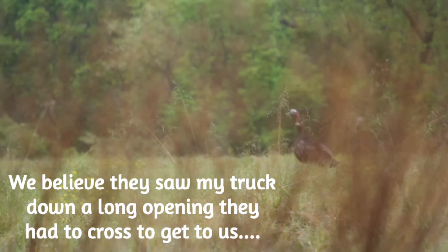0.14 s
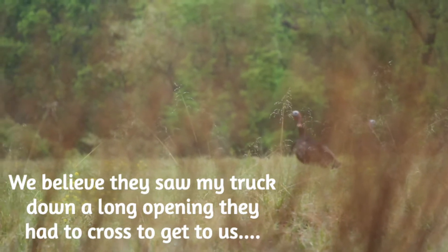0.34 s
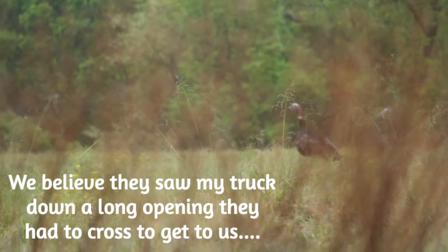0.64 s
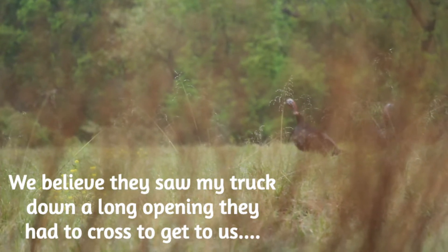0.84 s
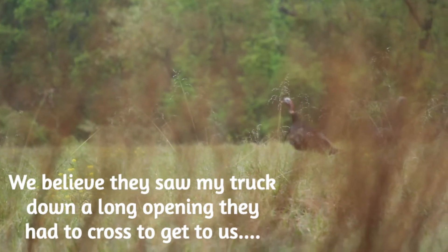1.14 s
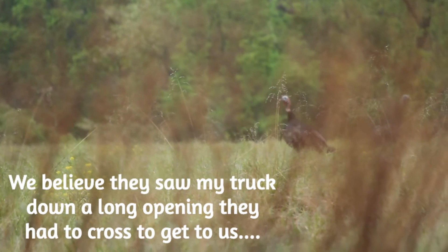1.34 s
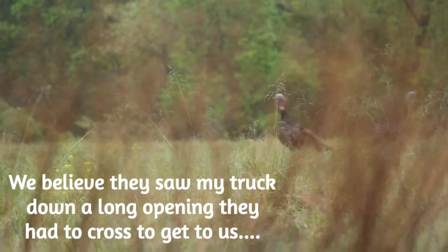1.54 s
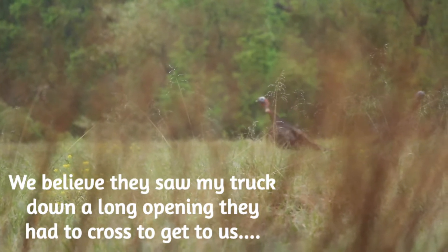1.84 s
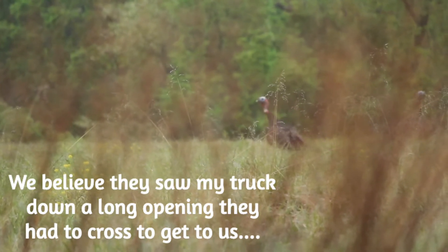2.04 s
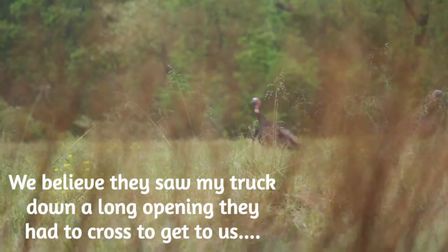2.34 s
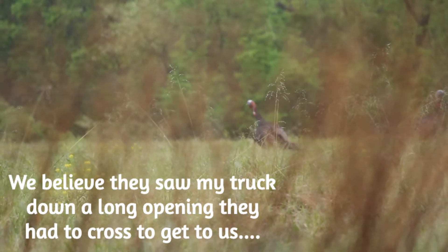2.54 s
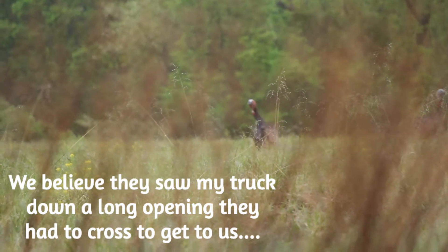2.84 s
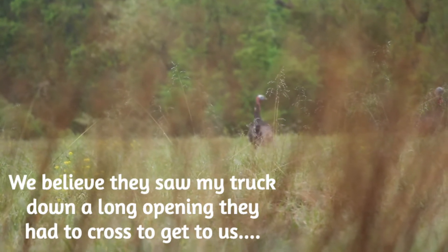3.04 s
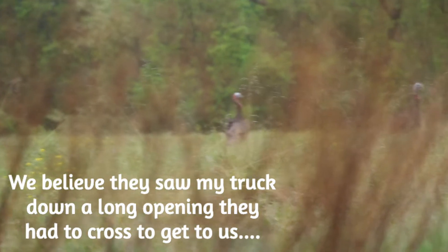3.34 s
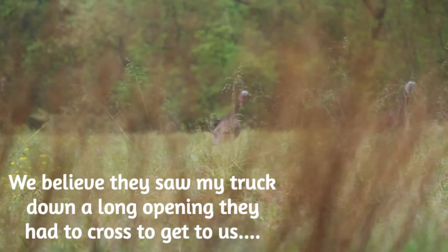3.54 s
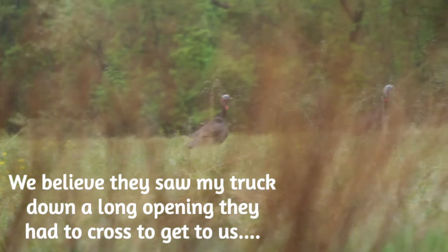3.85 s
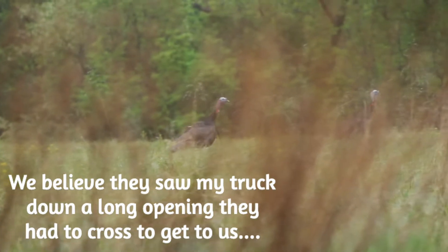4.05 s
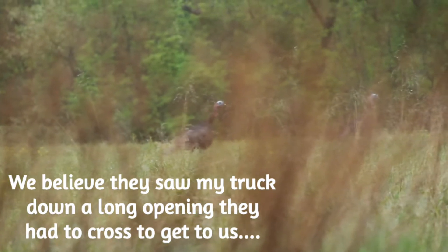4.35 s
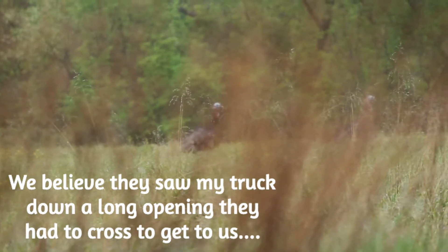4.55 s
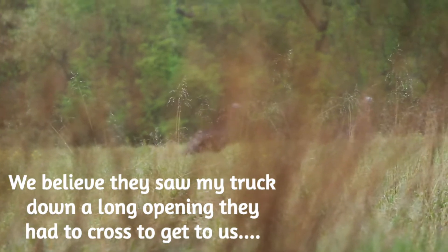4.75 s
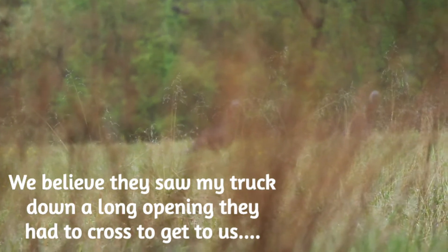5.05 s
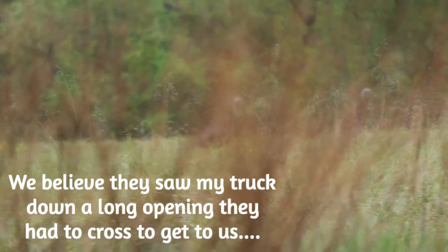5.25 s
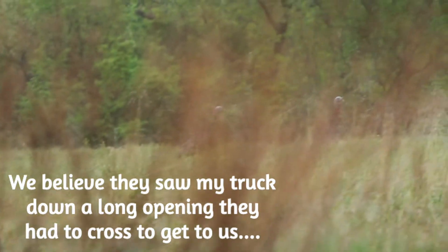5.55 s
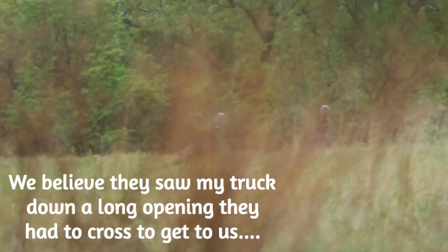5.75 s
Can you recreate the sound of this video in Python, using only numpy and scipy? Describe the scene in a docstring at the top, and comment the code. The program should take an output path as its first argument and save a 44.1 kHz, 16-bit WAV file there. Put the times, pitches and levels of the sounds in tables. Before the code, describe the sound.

Quiet outdoor hush at a wooded field edge, one channel. In the first second there are small ringing ticks and dry snaps close to the microphone, a tiny distant chip near 0.5 s and a faint, high, wavering bird wheeze at 0.75 s. At 1.0 s a turkey voice starts yelping, very loud and near: twelve short, nasal, hollow yelps about a third of a second apart, until 4.75 s. The first are clipped and plainer; later ones are longer, brighter and raspier, each flicking upward at the end, some with a popping onset and overload grit. A very short diffuse echo follows, and the hush ducks under each. Faint wheezes recur around 2.3, 3.4 and 4.3 s, with barely audible far whistles. A snap at 4.8 s, then a dull knock and scuff at 5.1 s, rustling and sharper ticks from 5.2 s, and a last wheeze at 5.5 s.

```python
"""Twelve loud turkey yelps, close by at the edge of a field: harmonic stacks shaped by an opening mouth,
with throat hiss and an opening puff; waves beyond full scale clip. A small bird wheezes in wavering lines
over breath noise, another chips and whistles far off in gliding tones. Something near ticks in ringing
modes, and knocks, snaps and rustles in tones and noise bursts over the hush of the woods, which is shaped
noise that sinks under each yelp. Decaying noise scatters the voices into a short echo."""
import sys
import numpy as np
from scipy import signal
from scipy.fft import rfft, irfft
from scipy.io import wavfile
from scipy.ndimage import uniform_filter1d

SR = 44100
rng = np.random.default_rng(int(sys.argv[2]) if len(sys.argv) > 2 else 0)


def transcribe(u):
    """Save the signal u as a 16-bit wav file named by the first command-line argument.

    u: samples, shape (n,) or (channels, n), limited to [-1, 1]; the rate is SR.
    q: integer samples, one column per channel.
    """
    v = np.clip(np.atleast_2d(u).T, -1, 1)
    q = np.round(v * 32767).astype(np.int16)
    wavfile.write(sys.argv[1], SR, q)


N = 260631
TIME = np.arange(N) / SR


def from_db(db):
    """Amplitude gain of a level in dB: a factor of ten every 20 dB."""
    return 10 ** (np.asarray(db) / 20)


def at_hz(points, hz):
    """Interpolate a spectrum in dB along a logarithmic frequency axis."""
    table_hz, table_db = np.array(points)[:, :2].T
    return np.interp(np.log(hz), np.log(table_hz), table_db)


def band(x, hz, width_hz):
    """Band-pass resonance: only components around the centre frequency pass."""
    edges = np.clip([hz - width_hz / 2, hz + width_hz / 2], 20, .45 * SR)
    return signal.sosfilt(signal.butter(2, edges, "band", fs=SR, output="sos"), x)


def drift(rate_hz):
    """Random modulation: white noise through a two-pole low-pass, scaled to a spread of 1."""
    r = np.exp(-2 * np.pi * rate_hz / SR)
    warm_up = 8000   # samples
    noise = rng.standard_normal(N + warm_up)
    slow = signal.lfilter([1], [1, -2 * r, r * r], noise)[warm_up:]
    return slow / slow.std()


def coloured(spectrum, peaks=()):
    """Spectral shaping: noise of rms 1 weighted by a spectrum and bell-shaped resonances."""
    hz = np.maximum(np.fft.rfftfreq(N, 1 / SR), 1)
    power = 1 + sum(from_db(2 * db) / (1 + (2 * (hz - f) / width) ** 4) for f, width, db in peaks)
    gain = from_db(at_hz(spectrum, hz)) * np.sqrt(power)
    x = irfft(rfft(rng.standard_normal(N)) * gain, N)
    return x / x.std()


def span(rows):
    """Piecewise-linear contours: a table's sample range and its columns, with rounded corners."""
    s, *columns = np.transpose(rows)
    part = slice(int(s[0] * SR), int(s[-1] * SR))
    return part, [uniform_filter1d(np.interp(TIME[part], s, c), size=130) for c in columns]


def bursts(rows, decay_s, breadth):
    """Impulsive noise: exponentially dying bursts, each band-limited to breadth times its centre."""
    length = 3000   # samples
    out, t = np.zeros(N), np.arange(length) / SR
    for (s, db, hz), noise in zip(rows, rng.standard_normal((len(rows), length))):
        dying = noise * np.exp(-t / decay_s)
        burst = band(band(dying, hz, breadth * hz), hz, breadth * hz)
        i = int(s * SR)
        out[i:i + length] += (from_db(db) * burst / np.abs(burst).max())[:N - i]
    return out


def background():
    """Broadband noise: a hush with fixed resonances, and a flickering rustle."""
    # levels ahead of the sinking under the yelps: time_s, hush_db, rustle_db
    around = [(0, -47, -54), (1.298, -45.5, -63.5), (3.8, -52, -61), (4.498, -50.5, -67.5),
              (5.051, -52.5, -57.5), (5.2, -55, -48.5), (5.38, -48, -42.5), (5.55, -61, -42),
              (5.75, -52, -43.5), (5.91, -47, -45)]
    # hush spectrum: frequency_hz, relative_db_per_hz
    hush_spectrum = [(20, -40), (30, -3), (90, -3.5), (170, -1), (400, -14), (1000, -10), (2300, -14),
                     (4000, -17), (5000, -21.5), (9000, -30.5), (15500, -51.5)]
    # resonances of the hush: centre_hz, width_hz, level_db relative to the spectrum there
    hush_peaks = [(514, 88, 8.5), (866, 33, 6), (1272, 200, 5), (1544, 69, 10), (3140, 590, 5),
                  (3394, 180, 14.5)]
    # rustle spectrum: frequency_hz, relative_db_per_hz
    rustle_spectrum = [(18, -46.5), (30, -10), (874, -7.5), (1970, -18.5), (3400, -13), (3680, -20),
                       (9940, -26.5), (15500, -52)]
    s, hush_db, rustle_db = np.transpose(around)
    hush_gain = from_db(np.interp(TIME, s, hush_db) + 1.5 * drift(25))
    hush = hush_gain * coloured(hush_spectrum, hush_peaks)
    rustle_gain = from_db(np.interp(TIME, s, rustle_db) + 1.0 * drift(11))
    return hush + rustle_gain * coloured(rustle_spectrum)


def sinking(voice):
    """Level-driven gain: the background sinks under each yelp and swells back by a one-pole lag."""
    sink_db, recover_s = -6.5, 0.1
    loud = uniform_filter1d((np.abs(voice) > .05) * 1., size=200) > 0
    r = np.exp(-1 / (recover_s * SR))
    lagging = signal.lfilter([1 - r], [1, -r], loud)
    return from_db(sink_db * np.clip(2.5 * lagging, 0, 1))   # full depth before the lag completes


def ticks():
    """Modal ringing: a few quick contacts excite the same damped modes at each tick."""
    # ringing ticks: time_s, level_db (before the mode and contact levels)
    tick_table = [(0.0293, -26.5), (0.1088, -34), (0.637, -33.5), (0.7163, -30.5), (0.797, -30.5),
                  (0.9796, -31.5), (2.085, -44), (2.409, -41), (2.432, -39), (2.78, -39.5), (2.819, -43),
                  (3.1141, -36), (3.579, -34.5), (3.755, -38.5), (3.843, -39.5), (3.919, -35.5),
                  (3.9477, -35), (4.1306, -37.5), (4.206, -48), (4.2733, -32.5), (4.5206, -44),
                  (4.554, -37.5), (4.607, -39.5), (4.8741, -36), (4.9031, -36), (5.4259, -27),
                  (5.5758, -30), (5.6132, -23.5), (5.88, -27)]
    # damped modes: frequency_hz, relative_db, t60_s, delay_s
    modes = [(1450, -5, .01, 0), (3030, -2, .02, .0045), (3420, 4, .016, .001), (4300, 1, .007, 0)]
    lags_s = np.array([0, .002, .004])
    tick_s, tick_db = np.array(tick_table)[:, :1], np.array(tick_table)[:, 1:2]
    at = ((tick_s - .001 + lags_s) * SR).astype(int)
    out = np.zeros(N)
    for hz, db, t60_s, delay_s in modes:
        clicks = np.full(N, 1e-18)
        contact_db = tick_db + db - 9 + 3.0 * rng.standard_normal(at.shape)   # uneven contacts
        clicks[at + int(delay_s * SR)] = from_db(contact_db)
        r, w = from_db(-60 / (t60_s * SR)), 2 * np.pi * hz / SR
        out += signal.lfilter([0, np.sin(w)], [1, -2 * r * np.cos(w), r * r], clicks)
    return band(out, 2900, 5000)


def snaps():
    """Dry snaps: impulses of noise with so short a decay that no pitch forms."""
    # snaps: time_s, peak_db, centre_hz
    snap_table = [(.406, -39.5, 9000), (.624, -36, 6140), (.631, -24, 1700), (.882, -31.5, 5400),
                  (1.007, -28.5, 5000), (1.02, -27.5, 400), (1.335, -26.5, 900), (1.499, -42, 4780),
                  (1.897, -37, 5960), (4.18, -35.5, 4000), (4.468, -32, 3600), (4.81, -39, 3300),
                  (4.829, -21, 2450)]
    return bursts(snap_table, decay_s=0.0016, breadth=1.0)


def bumps():
    """Damped oscillation: each bump on the housing rings briefly at its own pitch."""
    # bumps: time_s, level_db (before the rise and decay), pitch_hz
    bump_table = [(5.069, -25, 149), (5.077, -26, 770), (5.097, -29.5, 469), (5.116, -38, 980),
                  (5.265, -37.5, 895)]
    rise_s, decay_s = 0.00061, 0.011
    out = np.zeros(N)
    for s, db, hz in bump_table:
        t = np.maximum(TIME - s, 0)
        envelope = np.exp(-t / decay_s) * (1 - np.exp(-t / rise_s))
        out += from_db(db) * np.sin(2 * np.pi * hz * t) * envelope
    return out


def scuff():
    """Friction noise: a dull rub with the bumps, dying more slowly than the snaps."""
    # rub: time_s, peak_db, centre_hz
    rub_table = [(5.072, -26, 684), (5.074, -33, 2470)]
    return bursts(rub_table, decay_s=0.036, breadth=1.24)


def chips():
    """Narrow-band noise: short hissy chips with a hint of pitch."""
    # chips: time_s, peak_db, centre_hz
    chip_table = [(4.96, -39, 5390), (5.074, -37, 5070)]
    return bursts(chip_table, decay_s=0.024, breadth=0.22)


def whistles():
    """Frequency modulation: a far chip and whistles as single gliding tones, roughened by distance."""
    # one contour table a call: time_s, pitch_hz, level_db
    contours = [
        [(.478, 5700, -67), (.49, 6200, -46), (.505, 7750, -57), (.52, 6800, -53), (.535, 6800, -73)],
        [(.46, 4870, -68), (.5, 4950, -64), (.62, 4800, -69)],
        [(1.09, 2750, -66), (1.14, 2700, -58), (1.2, 2700, -66), (1.26, 2750, -60), (1.29, 2700, -70)],
        [(3.74, 6050, -80.5), (3.78, 6200, -63), (3.81, 6400, -77), (3.93, 6150, -78.5), (3.96, 6250, -73.5)],
        [(4.58, 7900, -76), (4.61, 8050, -70), (4.65, 8000, -74)],
    ]
    out, waver, flicker = np.zeros(N), drift(120), drift(36)
    for rows in contours:
        part, (hz, level_db) = span(rows)
        wave = np.sin(2 * np.pi * np.cumsum(hz + 70 * waver[part]) / SR)
        out[part] += from_db(level_db + 4.0 * flicker[part]) * wave
    return out


def wheezes():
    """Tone and turbulence: wavering lines of one stack over breath noise in the same band."""
    # calls: start_s, length_s, early_spacing_hz, mid_spacing_hz, end_spacing_hz, level_db
    calls = [(.737, .29, 1430, 1450, 1425, -49.5), (2.28, .22, 1500, 1460, 1405, -59),
             (3.438, .22, 1410, 1485, 1415, -54), (4.268, .24, 1480, 1500, 1425, -56.5),
             (5.497, .25, 1480, 1525, 1470, -51.5)]
    # lines of the stack: multiple of the spacing, relative_db
    stack = [(4, 0), (4.499, -18.5), (5.004, 2.5), (5.9, -4)]
    scoop_hz, scoop_s = 240, .012   # each call drops onto its pitch
    rise_s, fade_db_per_s = .012, 330
    flicker_db, waver_hz = 3.5, 16   # spreads; the waver grows with the line's multiple
    out = np.zeros(N)
    breath = band(band(rng.standard_normal(N), 8300, 3000), 8300, 3000)
    waver, flicker = [drift(90) for line in stack], [drift(42) for line in stack]
    for start, length, early_hz, mid_hz, end_hz, level_db in calls:
        part = slice(int(start * SR), int((start + length + .12) * SR))
        t = TIME[part] - start
        done = np.clip(t / length, 0, 1)
        bend_hz = 2 * mid_hz - early_hz - end_hz
        arch = early_hz + (end_hz - early_hz) * done + bend_hz * 2 * done * (1 - done)
        spacing = arch + scoop_hz * np.exp(-t / scoop_s)
        fading_db = level_db - fade_db_per_s * np.maximum(t - length, 0)
        gain = from_db(fading_db) * np.clip(t / rise_s, 0, 1)
        breathy = np.clip(.3 + .4 * np.exp(-(t / .04) ** 2), 0, 1)   # breathiest at the start
        lines = 0
        for (k, db), w, f in zip(stack, waver, flicker):
            phase = 2 * np.pi * np.cumsum(k * spacing + waver_hz * k * w[part]) / SR
            lines = lines + from_db(db + flicker_db * f[part]) * np.sin(phase)
        out[part] += gain * (np.sqrt(1 - breathy) * lines + 2.1 * np.sqrt(breathy) * breath[part])
    return out


def throat_hiss():
    """Turbulence and resonance: air hissing through the throat fills a set of noise bands."""
    # hiss bands: centre_hz, width_hz, level_db (before each yelp's brightness)
    hiss_bands = [(980, 160, -44), (1650, 220, -39), (3600, 1500, -59), (5800, 1100, -51.5),
                  (7540, 1100, -62), (9640, 540, -48), (10800, 1300, -59.5)]
    white = rng.standard_normal(N)
    return sum(from_db(db) * band(band(white, hz, w), hz, w) * np.sqrt(SR / w) for hz, w, db in hiss_bands)


def yelps():
    """Source and filter: a harmonic voice settles and climbs, breath fades, and the mouth opens and shuts."""
    # yelps: start_s, length_s, first_pitch_hz, settling_s, settled_pitch_hz, last_pitch_hz,
    # harmonic1_db, harmonic2_db, harmonic2_start_offset_db, harmonic2_fade_db,
    # harmonic3_widest_mouth_db, puff_peak_db
    yelp_table = [ (1.035, 0.042, 714, 0.017, 603.6, 685, -20, 1, -17, 9.5, -29, -20),
                  (1.36, 0.044, 672, 0.013, 727, 824, -16.5, 1, -14, 10, -28.5, -11.5),
                  (1.66, 0.048, 740.6, 0.016, 680, 879, -13.5, -1.5, -1, 12.5, -21.5, -27),
                  (1.955, .065, 787, 0.015, 674.3, 873, -13, -1, 0.4, 14.5, -19.5, -18.5),
                  (2.270, .076, 714, 0.026, 623.5, 840, -15, -0.5, 2, 16, -17.5, -5.5),
                  (2.593, 0.088, 780, 0.024, 631, 852, -13.5, -2, 3, 14, -15.5, -21),
                  (2.933, .084, 724.3, 0.022, 652.5, 850, -14, -0.5, 0, 14.5, -15, -13.5),
                  (3.259, 0.091, 771, 0.021, 656, 844, -14.5, -3, 1.5, 15, -15, -12.5),
                  (3.614, 0.097, 737.4, 0.011, 681, 887, -14.5, -0.5, -9, 17, -17.5, -20),
                  (3.964, 0.095, 780, 0.023, 668, 887, -15, -3, -2.5, 16, -15.5, -30),
                  (4.309, 0.089, 744, 0.0035, 699, 915, -14.5, -1, -8, 17.5, -17.5, -26),
                  (4.662, 0.086, 748, 0.0039, 701, 847, -14, -2.5, -4.5, 14, -17, -28.5), ]
    # resonances driven by the higher harmonics, before brightness and swell: frequency_hz, level_db
    upper = [(3800, -57), (4700, -51), (5800, -43), (6600, -52), (7500, -61), (8600, -68), (9800, -52),
             (11500, -67), (13000, -85)]
    # 3rd to 5th harmonic: widest_mouth_db relative to the 3rd, shut_mouth_loss_db
    mouth = [(0, 20.5), (-11, 13), (-25.5, 19.5)]
    rise_s, fall_s = 0.0046, 0.007
    lead_s, lead_db, lead_follows = .015, -24.5, .6   # soft lead-in; dB per dB of 3rd harmonic
    lead_sharp = 1.65   # pitch factor at the start of the lead-in
    climb_power = 4.4   # pitch climbs with this power of the elapsed share
    # 1st harmonic: steady fade, drop at the end, kick at the start
    first_fade_db, first_drop_db, first_kick_db, kick_s = 8, 2, 4.0, 0.0084
    settle_2nd_s = 0.0033   # the 2nd harmonic starts above or below its line and settles
    throat_hz, throat_width_hz, throat_max_db = 1750, 330, 6   # the 2nd climbs into this resonance
    widest_at, mouth_power = 0.39, 2.89   # share of the yelp; curve of the shutting
    rasp_db = -26.5   # fast unevenness of the voice
    brighten, bright_at_db = 0.35, -13   # dB of treble per dB of 3rd harmonic; reference level
    treble_swell_db = 5   # higher harmonics gain this towards the end

    air = throat_hiss()
    out, jitter, rasp, flutter = np.zeros(N), drift(430), drift(510), drift(110)
    for start, length, first_hz, settle_s, low_hz, last_hz, db1, db2, off_db, fade_db, db3, _ in yelp_table:
        part = slice(int((start - rise_s - lead_s) * SR), int((start + length + fall_s) * SR))
        t = TIME[part] - start
        done = np.clip(t / length, 0, 1)
        elapsed_s = done * length
        early = np.clip(-t / (rise_s + lead_s), 0, 1)
        late = np.clip((t - length) / fall_s, 0, 1)

        settling = (first_hz - low_hz) * np.exp(-elapsed_s / settle_s)
        pitch = low_hz + settling + (last_hz - low_hz) * done ** climb_power
        throat_db = throat_max_db * done / (1 + (2 * (2 * pitch - throat_hz) / throat_width_hz) ** 2)
        mouth_side = np.where(done < widest_at, widest_at, 1 - widest_at)
        shut = np.abs((done - widest_at) / mouth_side) ** mouth_power
        first_db = db1 - first_fade_db * done - first_drop_db * done ** 24.0
        first_db = first_db + first_kick_db * np.exp(-elapsed_s / kick_s)
        second_db = db2 + off_db * np.exp(-elapsed_s / settle_2nd_s) - fade_db * done + throat_db
        levels = [first_db, second_db] + [db3 + db - lost_db * shut for db, lost_db in mouth]

        pitch = pitch * (1 + (lead_sharp - 1) * early + 0.062 * late) * (1 + 0.005 * jitter[part])
        phase = 2 * np.pi * np.cumsum(pitch) / SR
        low = sum(from_db(db) * np.sin(k * phase - np.pi / 4 * k * k) for k, db in enumerate(levels, 1))
        low *= 1 + from_db(rasp_db) * rasp[part]

        high = 0
        for k in range(6, 18):
            # from the 6th to the 10th, a lower harmonic drives a resonance harder
            drive_db = at_hz(upper, k * pitch) - 2.2 * (k - 6) * (k < 11)
            flutter_db = 4 * np.roll(flutter, 9000 * k)[part]
            level_db = drive_db + treble_swell_db * done ** 3 + flutter_db
            high = high + from_db(level_db) * np.sin(k * phase)
        high += air[part] * (1 + 0.067 * np.cos(phase))   # hiss comes in puffs, one a cycle

        shape = np.clip(1 + t / rise_s, 0, 1) ** 1.2 * (1 - late) ** 0.75
        lead_shape = (1 - early) * (1 - shape) * (t < 0)
        lead_gain = from_db(lead_db + lead_follows * (db3 - bright_at_db))
        lead = lead_gain * lead_shape * (np.sin(phase) + 0.05 * np.sin(2 * phase))
        treble_gain = from_db(brighten * (db3 - bright_at_db))
        out[part] += shape * (low + treble_gain * high) + lead
    puffs = [(row[0] - 1.2 * rise_s, row[-1], 1250) for row in yelp_table]   # as the mouth opens
    return out + bursts(puffs, decay_s=.002, breadth=1.385)


def echoes(x):
    """Diffuse reverberation: convolution with decaying noise scatters returns from trees and ground."""
    echo_db, echo_t60_s = -24, 0.059
    t = np.arange(12000) / SR
    tail = rng.standard_normal(len(t)) * from_db(-60 * t / echo_t60_s)
    return from_db(echo_db) * signal.fftconvolve(x, tail / np.sqrt(np.sum(tail ** 2)))[:N]


def scene():
    """Superposition: the pressures of all sources add in one channel."""
    voice = yelps()
    birds = wheezes() + whistles()
    near = ticks() + snaps() + bumps() + scuff() + chips()
    returns = echoes(voice + 25 * birds)   # the far birds echo more strongly for their level
    return (voice + returns + birds + near + sinking(voice) * background())[None]


def record(dry):
    """Overload and band limit: the input clips at full scale, then a steep low-pass cuts the top."""
    cutoff_hz = 15750   # 70 dB down from here
    low_pass = signal.cheby2(12, 70, cutoff_hz, fs=SR, output="sos")
    return signal.sosfilt(low_pass, np.clip(dry, -1, 1))


dry = scene()
out = record(dry)
transcribe(out)
```